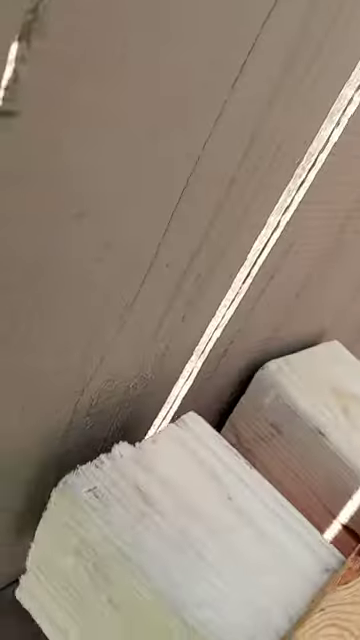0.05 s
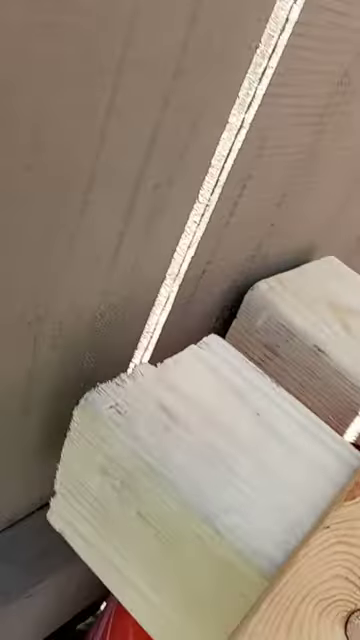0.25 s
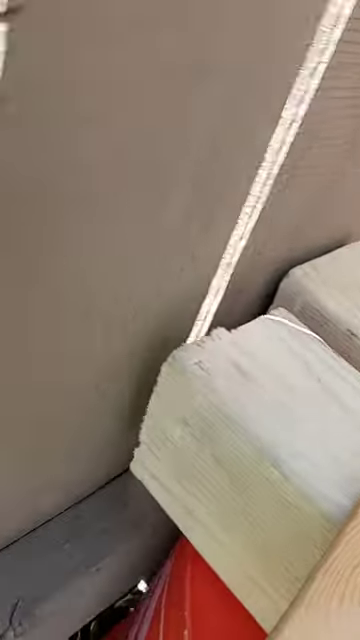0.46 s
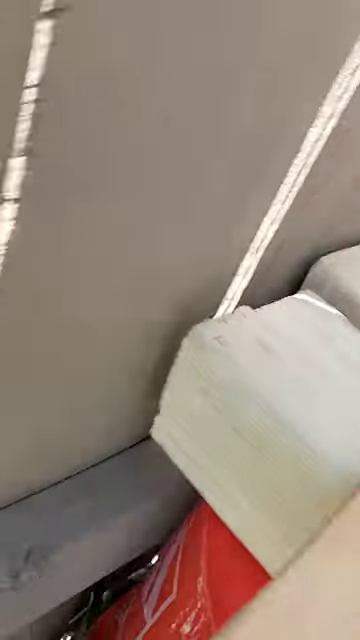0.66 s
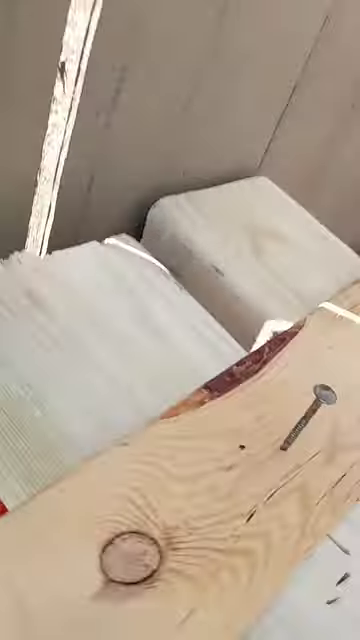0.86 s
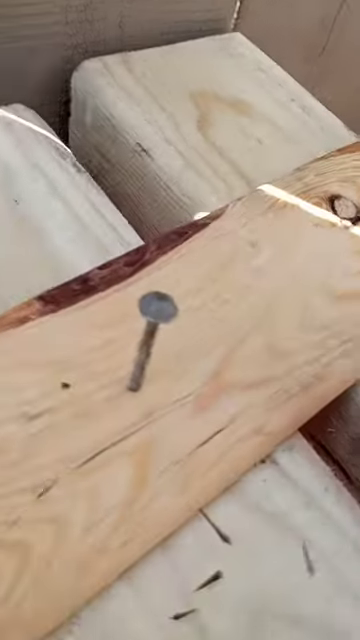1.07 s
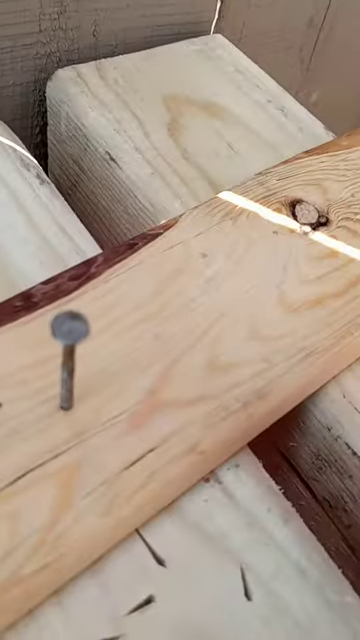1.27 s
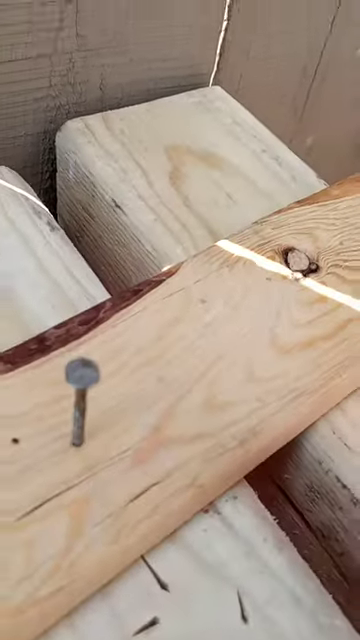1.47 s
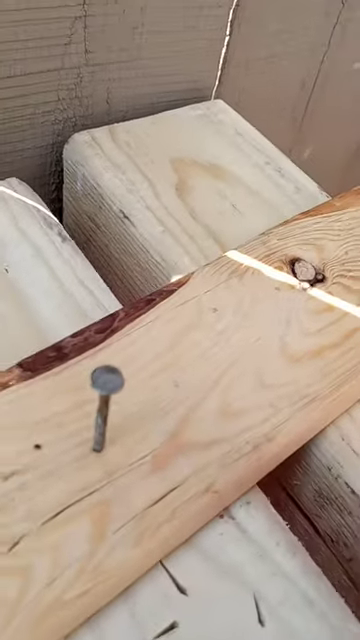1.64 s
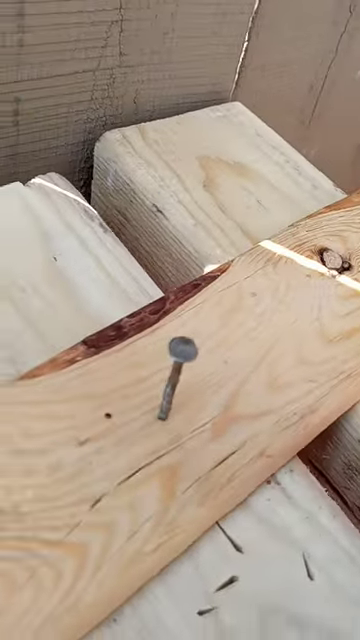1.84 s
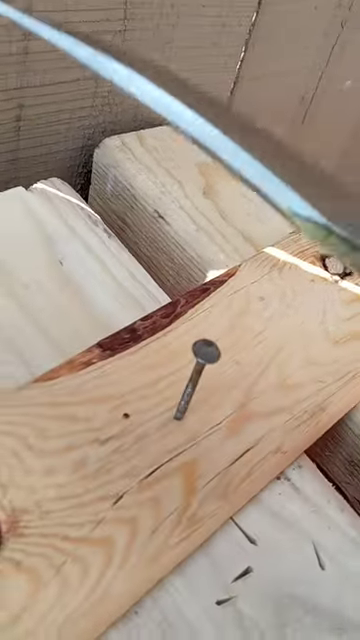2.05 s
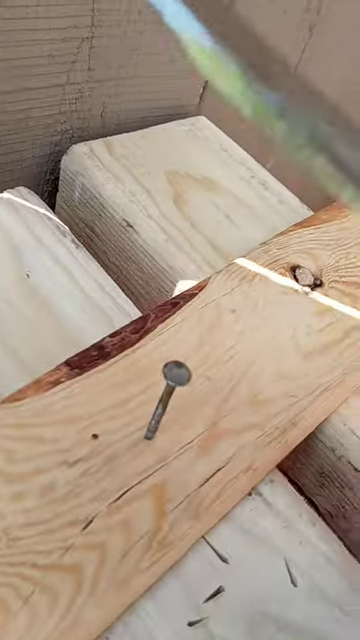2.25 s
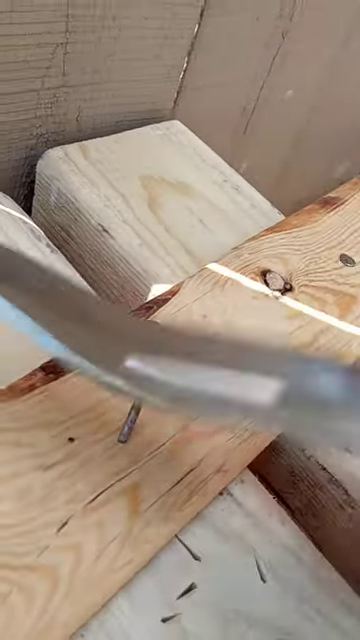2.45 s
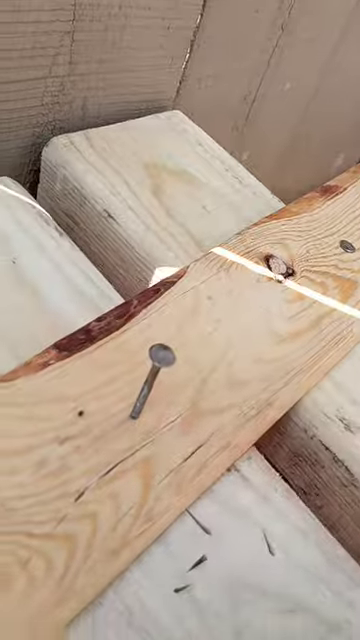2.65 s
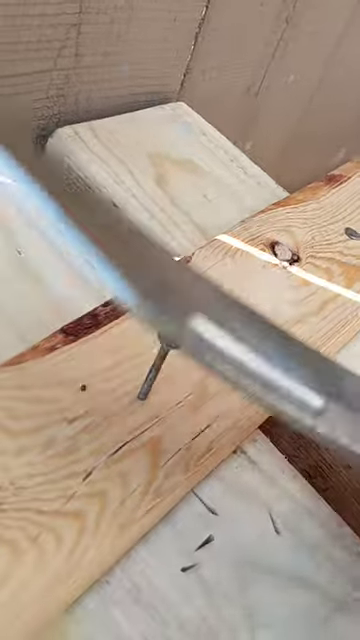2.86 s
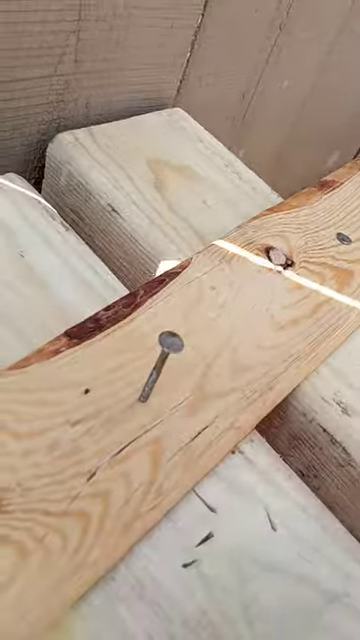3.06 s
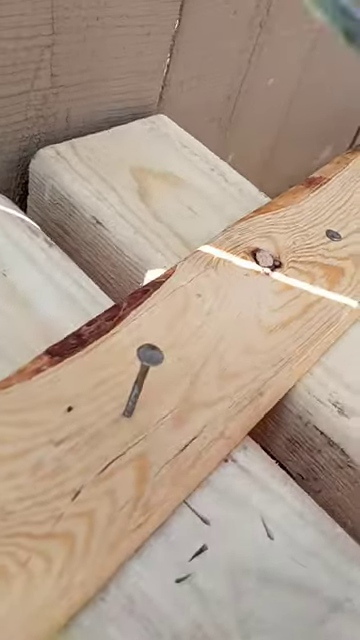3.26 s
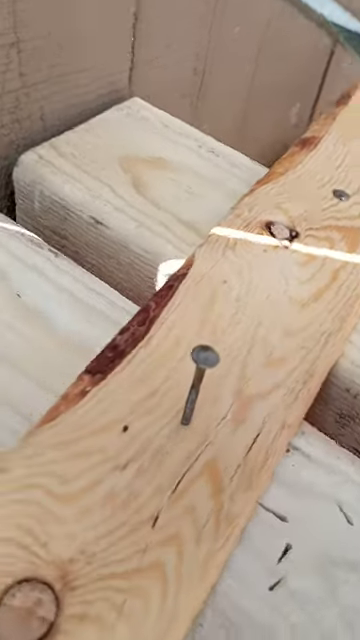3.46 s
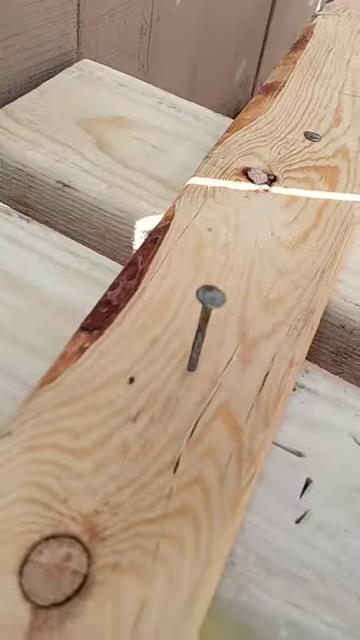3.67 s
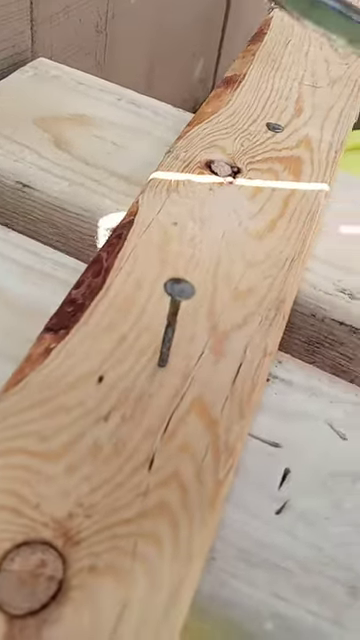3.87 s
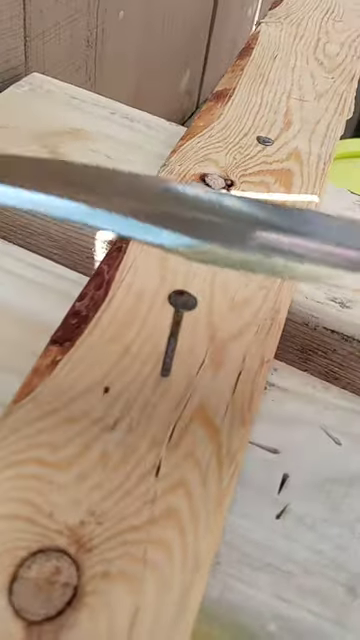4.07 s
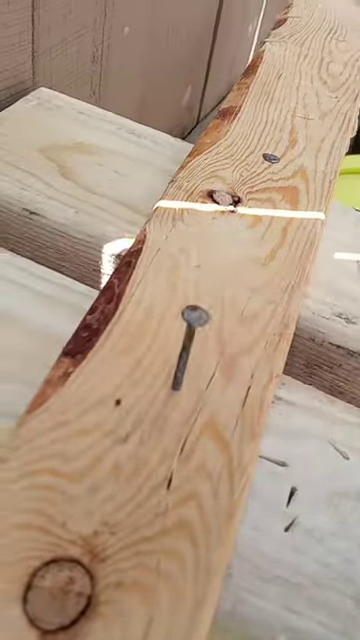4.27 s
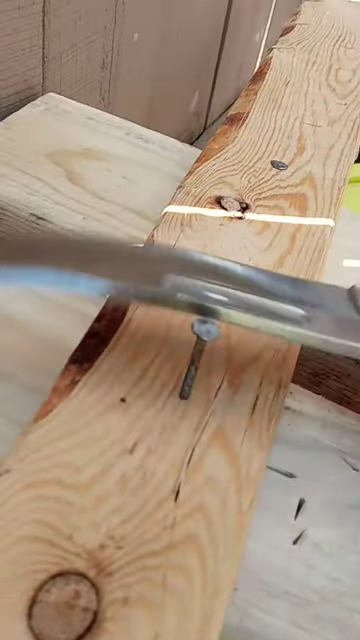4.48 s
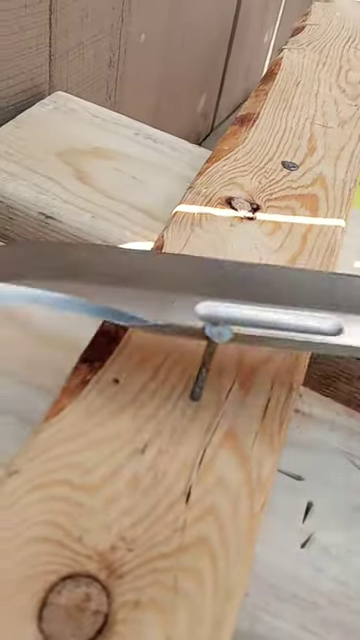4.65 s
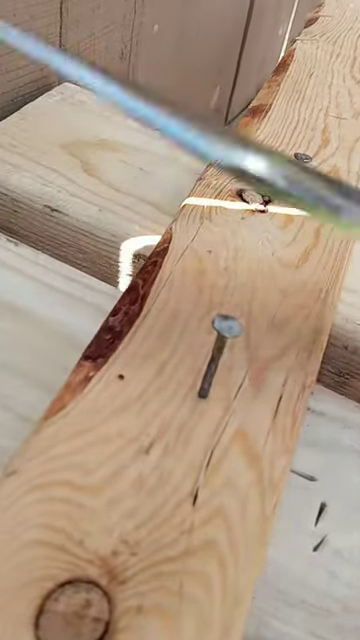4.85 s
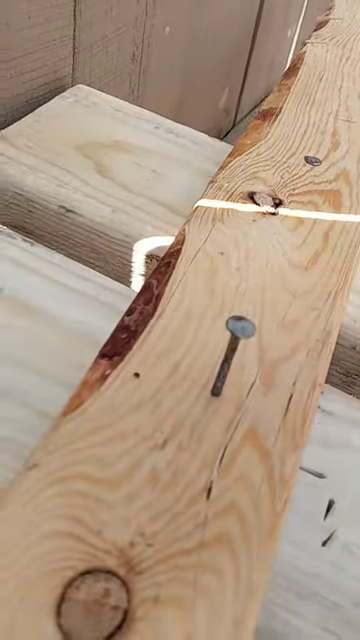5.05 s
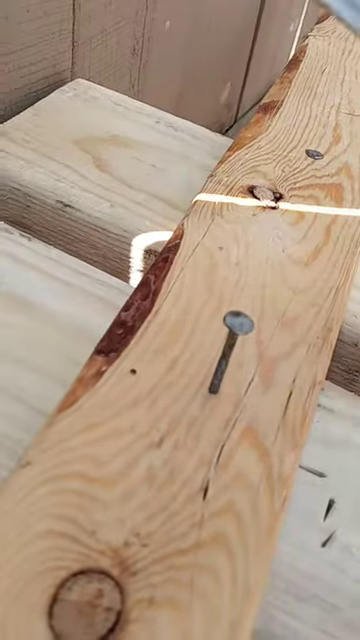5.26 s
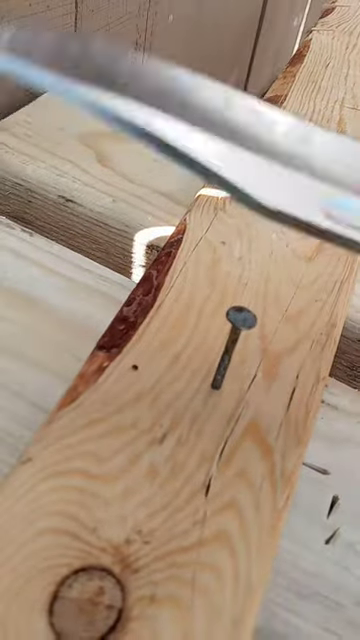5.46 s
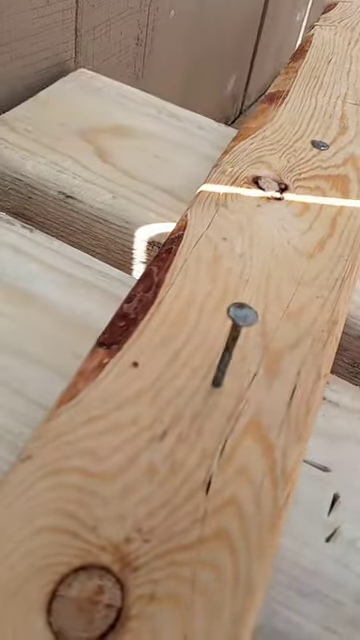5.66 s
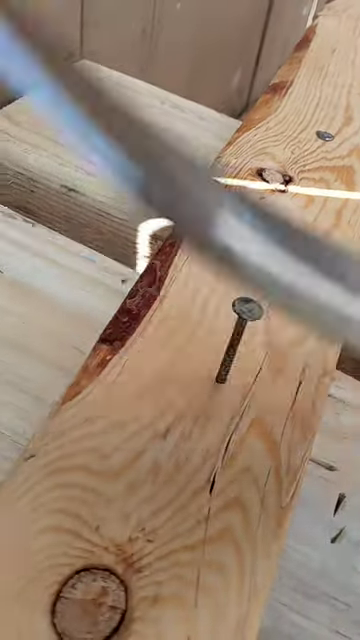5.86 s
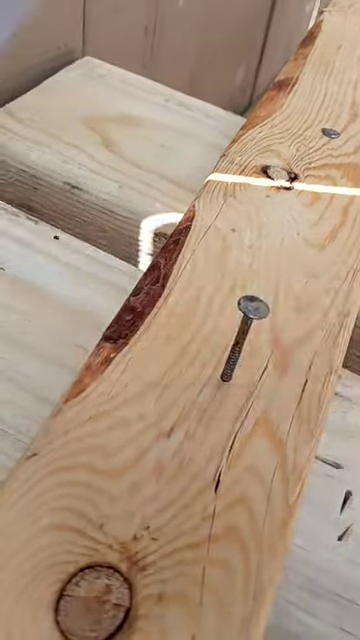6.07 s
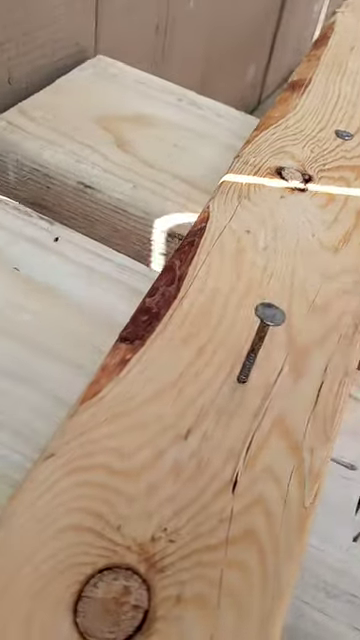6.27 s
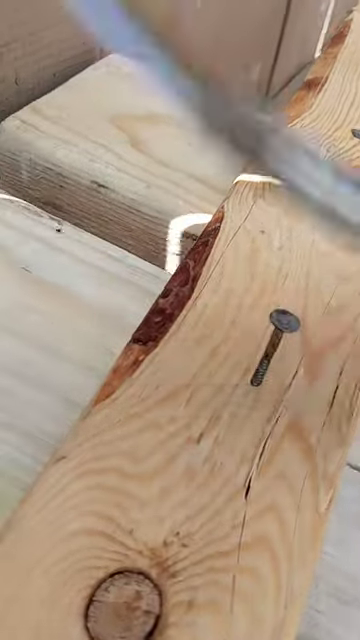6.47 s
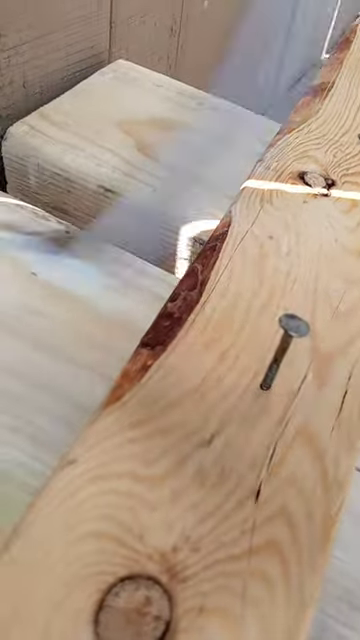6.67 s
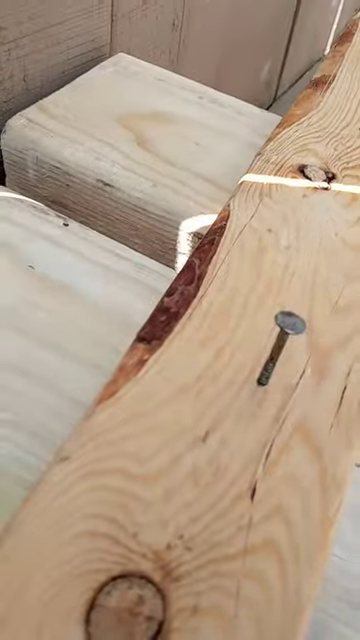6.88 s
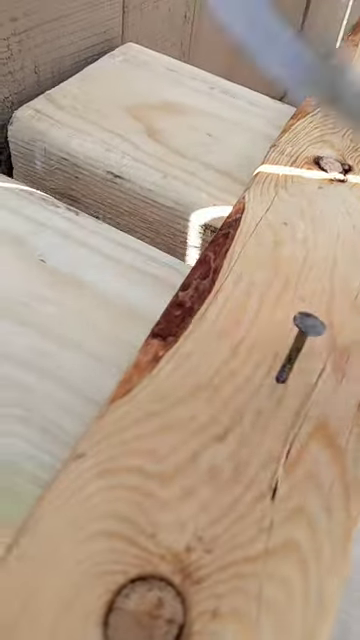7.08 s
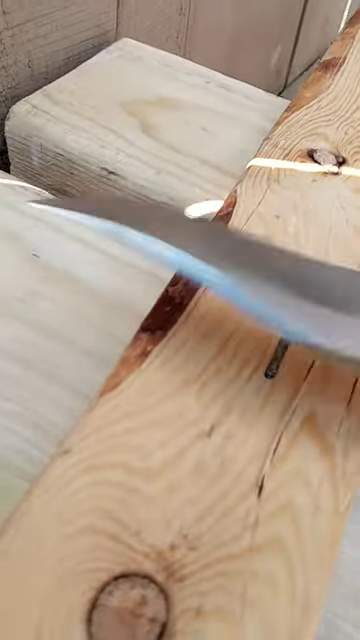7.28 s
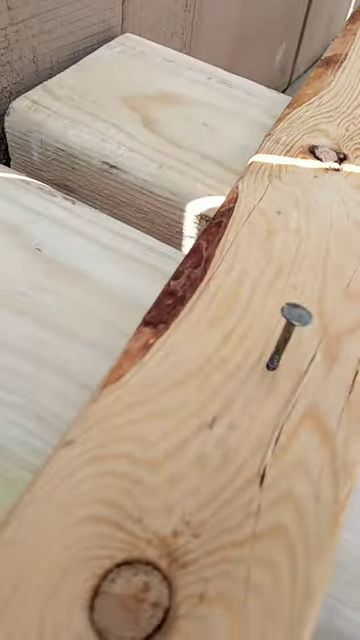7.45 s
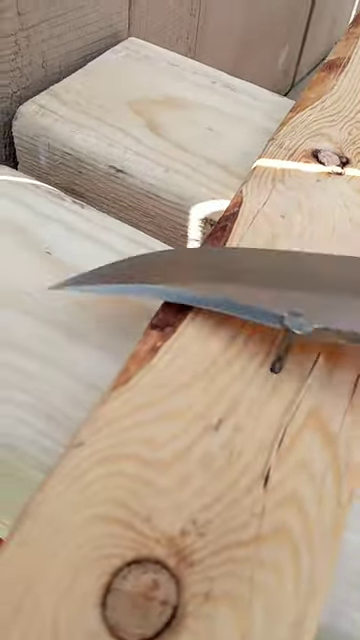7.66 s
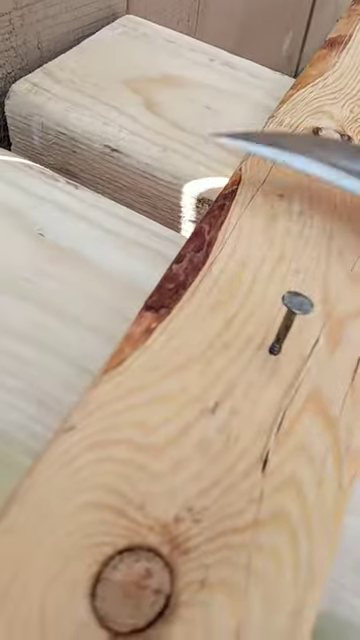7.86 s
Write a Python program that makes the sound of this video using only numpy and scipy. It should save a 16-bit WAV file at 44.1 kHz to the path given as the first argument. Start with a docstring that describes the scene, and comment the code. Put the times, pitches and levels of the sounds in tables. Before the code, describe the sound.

Quiet hum and airy hiss with grainy handling noise and faint ticks open the scene. A knife blade then strikes a nail: two short dry clicks, a pause, one double hit scraping off in jerks, another pause, and evenly spaced hard knocks. The plank chatters, steel rings only faintly, fences return a short blurred echo, and the close phone microphone ducks and distorts the loud hits.

```python
"""Compressor hum, hiss, rustling fingers and sleeve and light ticks come first; then a knife blade hammers a nail.
The nail stands in a loose plank in a fenced yard, a hand's width from the phone that records it.
Each blow is shaped noise through plank and support resonances, with decaying sines for the ringing blade.
The fences answer with a short noise echo; the phone's gain control ducks the blows and clips what is left."""
import sys
import numpy as np
from scipy import signal
from scipy.fft import rfft, irfft
from scipy.io import wavfile
from scipy.ndimage import uniform_filter1d, minimum_filter1d

SR = 44100
rng = np.random.default_rng(int(sys.argv[2]) if len(sys.argv) > 2 else 0)


def digitize_waveform(pressure):
    """Quantize a signal to 16-bit integers and store it at the path in sys.argv[1].

    Rows of a 2-D input are taken as channels; values are limited to [-1, 1].
    """
    field = np.atleast_2d(pressure).T
    bounded = np.clip(field, -1, 1)
    quanta = np.round(bounded * 32767).astype(np.int16)
    wavfile.write(sys.argv[1], SR, quanta)


N = 349272
TIME = np.arange(N) / SR


def undb(db):
    """Gain of a level in dB."""
    return 10 ** (np.asarray(db) / 20)


def unit(x):
    """Scaled to rms 1."""
    return x / np.sqrt(np.mean(x ** 2))


def curve(rows, column):
    """A column joined by straight lines in time."""
    rows = np.array(rows)
    return np.interp(TIME, rows[:, 0], rows[:, column])


def resonate(x, hz, width_hz):
    """Two-pole resonance, gain 1 at the centre."""
    return signal.lfilter(*signal.iirpeak(hz, hz / width_hz, fs=SR), x)


def band(x, lo_hz, hi_hz):
    """Band-pass."""
    sos = signal.butter(2, [lo_hz, min(hi_hz, .45 * SR)], "bandpass", fs=SR, output="sos")
    return signal.sosfilt(sos, x)


def walk(rate_hz):
    """Random levels held 1 / rate_hz seconds and slewed; spread 1."""
    k = int(SR / rate_hz)
    steps = np.repeat(rng.standard_normal(N // k + 1), k)
    return unit(uniform_filter1d(uniform_filter1d(steps, k), k)[:N])


def swells(rows):
    """Level in dB of sounds that fade in, hold and fade out; the fade time spans 20 dB."""
    levels = []
    for start_s, hold_s, fade_s, level_db in rows:
        outside_s = np.maximum(np.maximum(start_s - TIME, TIME - start_s - hold_s), 0)
        levels.append(level_db - 20 * outside_s / fade_s)
    return np.max(levels, axis=0)


def add(out, start_s, sound):
    """Mixes a sound in at its start time."""
    i = int(start_s * SR)
    out[i:i + len(sound)] += sound[:N - i]


# plank modes, relative levels before the blow's tilt; widths are scaled where played: pitch_hz, width_hz, level_db
PLANK_MODES = [(602, 73, 2), (856, 180, 1.5), (1126, 79, 2), (1400, 104, 7.5), (1592, 130, 5),
               (1910, 160, 8.5), (2246, 65, 8.5), (2560, 170, -4.5), (3105, 200, 2.5), (3300, 64, -5),
               (3530, 150, -7)]
# dense small modes of the plank, stronger when the blow glances (low knock)
GLANCE_DB, GLANCE_PER_KNOCK = 5.5, -0.45


def plank_chatter(force, t, chatter_s, rattle_db, bright_db, knock_db):
    """Contact noise drives the plank's modes, dulls as it dies and ends abruptly after chatter_s."""
    spot = undb(0.18 * rng.standard_normal(len(PLANK_MODES)))  # the blade lands a little differently each time
    # a weaker rattle from the start of the blow, dying away more evenly
    rattle = undb(rattle_db) * np.exp(-t / 0.012)
    plank = 0
    for spot_gain, (hz, width_hz, level_db) in zip(spot, PLANK_MODES):
        # high modes lose contact force first
        contact = np.exp(-t / 0.02 * (hz / 1500) ** 1.1 - (t / chatter_s) ** 8) + rattle
        mode_db = level_db + bright_db * np.log2(hz / 1500) + knock_db * (hz < 1000)
        gain = spot_gain * undb(mode_db) * np.sqrt(1000 / width_hz)
        plank = plank + gain * resonate(force * contact, hz, 1.49 * width_hz)
    # the small modes share the contact of the highest plank mode
    glance = undb(GLANCE_DB + GLANCE_PER_KNOCK * knock_db) * band(force * contact, 1270.0, 3950.0)
    return plank + glance


# supports under the plank, relative levels: pitch_hz, width_hz, level_db
SUPPORT_MODES = [(129, 24.6, -8.5), (200.6, 74, -6.5), (215, 25, -10), (277, 67, -19.5), (464, 13, -25),
                 (515, 110, -63)]


def support_thud(t):
    """A short noisy push and a slower wobble excite the supports' low resonances."""
    envelope = np.exp(-t / 0.0043) + undb(-1.0) * t / 0.02 * np.exp(-t / 0.019)
    push = envelope * rng.standard_normal(len(t))
    return sum(undb(level_db) * np.sqrt(1000 / width_hz) * resonate(push, hz, width_hz)
               for hz, width_hz, level_db in SUPPORT_MODES)


# blade partials, relative levels before the tilt: pitch_hz, level_db, t60_s
BLADE_PARTIALS = [(1530, -14, 0.5), (2030, 3, 0.41), (2650, -6.5, 0.43), (2960, 1.5, 0.44),
                  (3610, -2, 0.33)]
# the tilt, in dB per octave about 2400 Hz, rises with the knock of a square blow
RING_TILT_DB, TILT_PER_KNOCK = 13, 1.14


def blade_ring(t, knock_db):
    """Sine partials of the steel die away, shivering because the grip damps them unevenly."""
    slow_noise = 20 * uniform_filter1d(rng.standard_normal((len(BLADE_PARTIALS), len(t))), 400)
    shiver = undb(4.5 * slow_noise)
    tilt_db = RING_TILT_DB + TILT_PER_KNOCK * knock_db
    ring = 0
    for wobble, (hz, level_db, t60_s) in zip(shiver, BLADE_PARTIALS):
        gain = wobble * undb(level_db + tilt_db * np.log2(hz / 2400))
        ring = ring + gain * np.sin(2 * np.pi * hz * t) * 1000 ** (-t / t60_s)
    return ring


def blow(chatter_s, rattle_db, bright_db, knock_db, thud_db):
    """Steel crack, plank chatter, wobble of the supports and ring of the blade in one blow."""
    t = np.arange(SR // 2) / SR
    force = rng.standard_normal(len(t))
    plank = plank_chatter(force, t, chatter_s, rattle_db, bright_db, knock_db)
    crack = undb(18.0) * band(force, 2600.0, 9400.0) * np.exp(-t / 0.0005)
    thud = undb(thud_db + 13.5) * support_thud(t)
    return plank + crack + thud + undb(-37) * blade_ring(t, knock_db)


# blows on the nail, before the phone's gain control; brightness is a tilt per octave, thud and echo are relative:
# start_s, strength_db, chatter_s, rattle_db, brightness_db_per_octave, low_knock_db, thud_db, echo_db
BLOWS = [(2.525, 1.5, 0.0026, -4, 4.5, -22.5, -0.5, 5.5), (2.860, 6.5, 0.0042, -6.5, 1, -20, -1.5, 9),
         (4.53, 7, 0.024, -14.5, -10.5, -22, -2.5, 10.5), (4.598, 4.5, 0.0078, -25, -0.5, 2.5, -8, 2.5),
         (5.851, 3.5, 0.011, -14, 1, -17, -1, 10), (6.157, 10.5, 0.016, -20, -3, -10, -7, 10),
         (6.456, 9.5, 0.015, -14.5, 0, -3.5, -2.5, 10), (6.749, 11, 0.029, -12, 0, 0.5, -8.5, 6),
         (7.046, 9.5, 0.024, -7, 1.5, 2.5, -6.5, 8), (7.340, 10.5, 0.024, -8, 3.5, 5, -2, 9),
         (7.623, 16.5, 0.045, -14, 7.5, -0.5, -10, 5), (7.691, 0.5, 0.0091, -35, -13, -9.5, -12, 4)]


def hammering(fences):
    """Each blow is heard directly and again through the yard's response."""
    out = np.zeros(N)
    for start_s, strength_db, *how, echo_db in BLOWS:
        direct = blow(*how)
        echo = signal.fftconvolve(direct, fences)[:len(direct)]
        add(out, start_s, undb(strength_db) * (direct + undb(echo_db) * echo))
    return out


# the blade skids off the nail in jerks; levels of the slips: start_s, hold_s, fade_s, level_db
SKID_JERKS = [(4.665, 0.0077, 0.011, -1.5), (4.682, 0.0052, 0.01, -5), (4.696, 0.0074, 0.0089, -1),
              (4.709, .004, .008, 1.5), (4.721, 0.013, 0.015, 2)]
# blade flat against nail and plank, relative levels; widths are scaled where played: pitch_hz, width_hz, level_db
SKID_MODES = [(592, 120, -2), (860, 94, -3.5), (1140, 64, 2.5), (1373, 66, -3), (1620, 96, 1.5),
              (2330, 160, 3.5), (2810, 190, -3), (3670, 300, -7.5)]
# tones that ring on from the slips, gains on their resonances: pitch_hz, level_db, t60_s
SKID_RING = [(1412., 26.5, 0.13), (1115, 8, 0.14), (607, 15.5, 0.14)]


def skidding(fences):
    """Uneven stick-slip clicks drive broad blade and plank modes and a few ringing ones, then the yard."""
    clicks = rng.standard_normal(N) * (rng.random(N) < .2)
    slips = clicks * undb(0.45 * walk(180.0) + swells(SKID_JERKS))
    skid = undb(-5.0) * unit(band(slips, 1200.0, 7500.0))
    for hz, width_hz, level_db in SKID_MODES:
        mode = resonate(resonate(slips, hz, 2.0 * width_hz), hz, 2.0 * width_hz)
        skid = skid + undb(level_db) * unit(mode)
    skid = skid * np.sqrt(np.mean(slips ** 2))  # levels relative to the rms of the slips
    for hz, level_db, t60_s in SKID_RING:
        skid = skid + undb(level_db) * resonate(slips, hz, np.log(1000) / (np.pi * t60_s))
    return skid + undb(-5) * signal.fftconvolve(skid, fences)[:N]


NEAR_DB, NEAR_T60_S = -10, 0.071  # scatter from the timber
ECHO_DB, ECHO_LAG_S, ECHO_RISE_S, ECHO_T60_S = -14, 0.038, 0.055, 0.11  # echo from the fences


def yard():
    """Response of the yard: close scatter from the timber, then a blurred echo from the fences."""
    t = np.arange(SR // 2) / SR
    late = np.maximum(t - ECHO_LAG_S, 0)
    near = undb(NEAR_DB) * 1000 ** (-t / NEAR_T60_S)
    echo = undb(ECHO_DB) * (1 - np.exp(-late / ECHO_RISE_S)) * 1000 ** (-late / ECHO_T60_S)
    return band(rng.standard_normal(len(t)), 340.0, 9200.0) * (near + echo) / np.sqrt(SR / 20)


# light touches, ticks and rebounds; level is the peak without fizz, ping and fizz are relative to the noise burst:
# start_s, level_db, pitch_hz, t60_s, ping_db, fizz_db
TICKS = [(.080, -26.5, 580, 0.023, 8.5, -20), (.230, -19, 646, 0.075, -8, -25),
         (.717, -15.5, 2850, 0.032, 1, 1), (2.915, -23, 2020, .04, -2, -26),
         (3.231, -25, 830, 0.017, -7, -1), (4.566, 17.5, 2230, 0.018, -1, -13),
         (4.589, -9, 1510, 0.062, -14, 0), (5.886, 7, 1400, 0.042, 11, -25),
         (6.114, -29, 1620, 0.013, -6, 11), (6.222, -4.5, 506, 0.082, -6, -30),
         (6.251, -24, 3000, .015, -5, 5), (6.535, -7.5, 412, 0.1, -4.5, -30),
         (7.683, 1.5, 1600, 0.01, -17, 11.5), (7.766, -12, 2970, 0.053, -9, -10),
         (7.767, -19, 620, 0.044, 2, -30), (7.79, -21, 597, 0.12, -1, -30),
         (7.788, -4.5, 1540, 0.044, -8, -4.5), (7.796, -8, 3220, 0.033, -2, -28)]


def ticks():
    """Short noise clicks that ping at their own pitch, each with some fizz on top."""
    out, t = np.zeros(N), np.arange(SR // 8) / SR
    for start_s, level_db, hz, t60_s, ping_db, fizz_db in TICKS:
        burst = rng.standard_normal(len(t)) * 1000 ** (-t / t60_s)
        ping = np.sin(2 * np.pi * hz * t) * t * 1000 ** (-t / (0.66 * t60_s))
        body = undb(ping_db) * unit(ping) + unit(band(burst, hz / 2, 2 * hz))
        click = body + undb(fizz_db) * unit(band(burst, 2900.0, 20000.0))
        add(out, start_s, undb(level_db) * click / np.abs(body).max())
    return out


# grip shifts on the phone, at the microphone: start_s, hold_s, fade_s, level_db
HANDLING = [(.08, .08, 0.091, -46), (.19, 0.054, 0.025, -31.5), (.28, .12, 0.088, -33.5),
            (.47, 0.039, 0.17, -48), (4.33, 0.042, 0.11, -39.5)]


def handling(grain):
    """Grainy noise of fingers rubbing the phone's case, with a low rumble beneath."""
    rub = unit(band(grain, 530.0, 1280.0) + undb(-3.5) * band(grain, 1630.0, 4700.0))
    rumble = undb(1) * unit(band(grain, 110.0, 236.0))
    return undb(swells(HANDLING)) * (rub + rumble)


# sleeve near the phone: start_s, hold_s, fade_s, level_db
RUSTLE = [(.0, .03, .03, -61), (.11, 0.43, 0.071, -56), (.53, .08, 0.051, -46), (.74, .11, 0.11, -56),
          (1.27, 0.02, 0.034, -37.5), (3.225, 0.027, 0.056, -43.5), (3.39, .02, .1, -62),
          (3.636, .005, 0.018, -54), (3.76, 0.11, 0.098, -58), (4.28, 0.072, 0.13, -50.5),
          (4.822, .01, .06, -59), (4.99, .19, .05, -53), (5.25, .03, 0.058, -48), (5.462, 0.018, .06, -58),
          (5.56, .1, .1, -63), (6.58, .12, 0.065, -52), (6.86, 0.091, .04, -56)]


def sleeve():
    """Thin high cloth noise over a lower body; a very faint flickering high noise lies beneath the swells."""
    cloth = rng.standard_normal(N) * undb(3. * walk(150.))
    faint = undb(-80.5 + 4.4 * walk(21.0))
    level = undb(swells(RUSTLE)) + faint
    body = undb(-3) * unit(band(cloth, 1450.0, 2800.0))
    return level * (unit(band(cloth, 4300.0, 12500.0)) + body)


# a narrow hiss near 3.6 kHz comes and goes: start_s, hold_s, fade_s, level_db
WHISTLE = [(.125, .04, 0.022, -41), (.5, 0.089, 0.1, -42)]


def whistle(grain):
    """The rubbing's grain through two equal resonances gives a narrow hiss."""
    narrow = resonate(resonate(grain, 3630.0, 350.), 3630.0, 350.)
    return undb(swells(WHISTLE)) * unit(narrow)


def hands():
    """Rubbing fingers, sleeve and narrow hiss; fingers and narrow hiss share one grainy noise."""
    grain = rng.standard_normal(N) * undb(1.75 * walk(151.9))
    return handling(grain) + sleeve() + whistle(grain)


# lines of the nearby compressor, mean levels: pitch_hz, level_db
HUM = [(59.2, -55.5), (86.1, -45), (118.4, -47), (145.3, -43), (172.3, -45), (231.5, -50)]
# a faint tone near 430 Hz swells and fades: start_s, hold_s, fade_s, level_db
DRONE = [(1., .45, 0.27, -57), (1.9, 0.052, .4, -64.5)]


def compressor():
    """Sine lines that waver in level and slightly in pitch, with the faint tone among them."""
    hum = 0
    for hz, level_db in [*HUM, (431., swells(DRONE))]:
        gain = np.sqrt(2) * undb(level_db + 2.35 * walk(2.74))
        line_hz = hz * (1 + 0.001594 * walk(1.175))
        phase = 2 * np.pi * np.cumsum(line_hz) / SR + 2 * np.pi * rng.random()
        hum = hum + gain * np.sin(phase)
    return hum


# spectrum shape of rumble and hiss; only differences inside a band count: pitch_hz, density_db
HISS_SHAPE = [(18, -57), (30, -20), (71, -12), (112, -8), (174, -4), (280, -17.5), (364, -27), (430, -25),
              (580, -37), (870, -25), (1600, -17.5), (2300, -21.5), (2900, -25.5), (3700, -22),
              (4400, -28.5), (4900, -45), (6000, -47), (6800, -31.5), (8800, -34), (9700, -54.5),
              (16000, -78)]
# mean levels of the hiss bands 580-2000, 2000-5400 and above 5400 Hz: start_s, low_db, middle_db, high_db
HISS_LEVEL = [(0, -48, -45.5, -52), (2.2, -50, -44.5, -54), (3.7, -50, -48, -52), (5.4, -48.5, -47.5, -51),
              (7.0, -49.5, -43.5, -50), (7.92, -49, -46, -52)]


def hiss():
    """Shaped noise split into a low rumble and three hiss bands that drift and flicker a little."""
    hz = np.maximum(np.arange(N // 2 + 1) * SR / N, 1)
    points = np.array(HISS_SHAPE)
    shape_db = np.interp(np.log(hz), np.log(points[:, 0]), points[:, 1])
    air = rfft(rng.standard_normal(N)) * undb(shape_db)
    parts = []
    for lo_hz, hi_hz in [(0, 580), (580, 2000), (2000, 5400), (5400, SR)]:
        part = unit(irfft(air * ((hz >= lo_hz) & (hz < hi_hz)), N))
        parts.append(part * undb(0.69 * walk(5.3)))
    rumble, *hiss_bands = parts
    out = undb(-41.5) * rumble
    for column, part in enumerate(hiss_bands, start=1):
        out = out + undb(curve(HISS_LEVEL, column)) * part
    return out


# dips of the phone's microphone port: pitch_hz, width_hz, share_removed
MIC_DIPS = [(5060, 1830, 0.91), (5720, 1000, 0.69)]


def scene():
    """Blows, skid, ticks and hands heard through the microphone port, over the background."""
    fences = yard()
    near = hammering(fences) + skidding(fences) + ticks() + hands()
    for hz, width_hz, share in MIC_DIPS:
        near = near - share * resonate(near, hz, width_hz)
    return (near + compressor() + hiss())[None]


DUCK_FROM_DB, DUCK_SLOPE, DUCK_MOST_DB = -15., .9, 14.  # slope in dB of ducking per dB over
AHEAD_S, HOLD_S, RECOVER_S = .013, 0.014, 0.015
CLIP, TOP_HZ = 0.82, 16300  # clip level as a share of full scale


def record(dry):
    """Gain control looks ahead and ducks loud sounds; what is still too loud clips; the top is cut."""
    over_db = 20 * np.log10(uniform_filter1d(np.abs(dry), 64) + 1e-9) - DUCK_FROM_DB
    want_db = -np.clip(DUCK_SLOPE * over_db, 0, DUCK_MOST_DB)
    ahead, hold = int(AHEAD_S * SR), int(HOLD_S * SR)
    held_db = minimum_filter1d(want_db, ahead + hold, origin=(hold - ahead) // 2)
    keep = np.exp(-1 / (RECOVER_S * SR))
    slow_db = signal.lfilter([1 - keep], [1, -keep], held_db)
    # the lower level wins: ducking is quick, recovery slow
    gain = undb(uniform_filter1d(np.minimum(held_db, slow_db), 128))
    clipped = np.clip(dry * gain, -CLIP, CLIP)
    no_dc = signal.sosfilt(signal.butter(2, 45., "highpass", fs=SR, output="sos"), clipped)
    return signal.sosfilt(signal.ellip(8, .2, 80, TOP_HZ, fs=SR, output="sos"), no_dc)


dry = scene()
out = record(dry)
digitize_waveform(out)
```